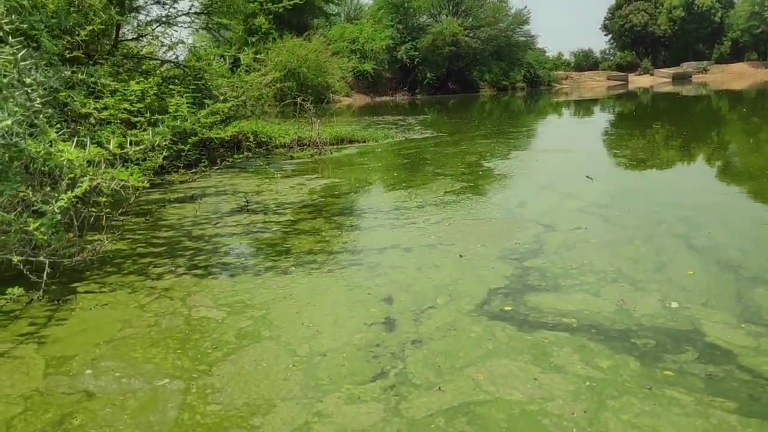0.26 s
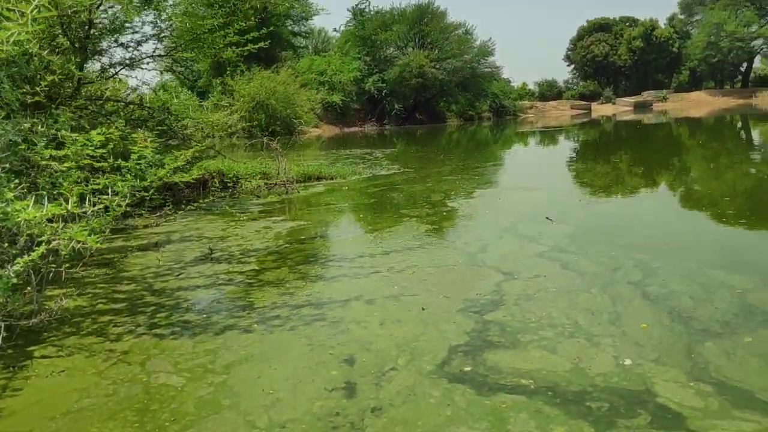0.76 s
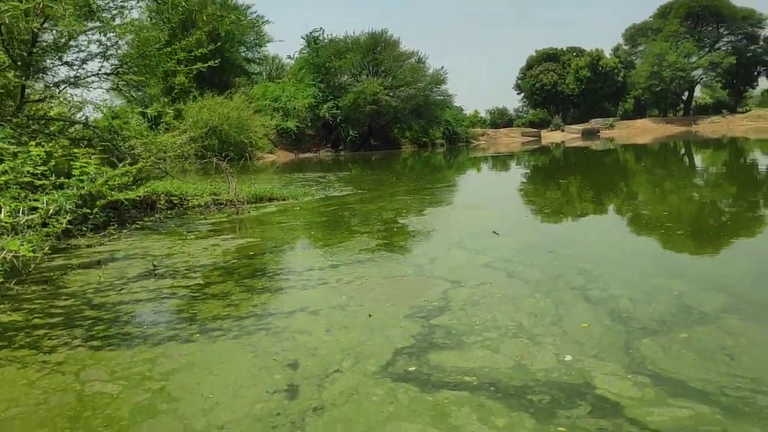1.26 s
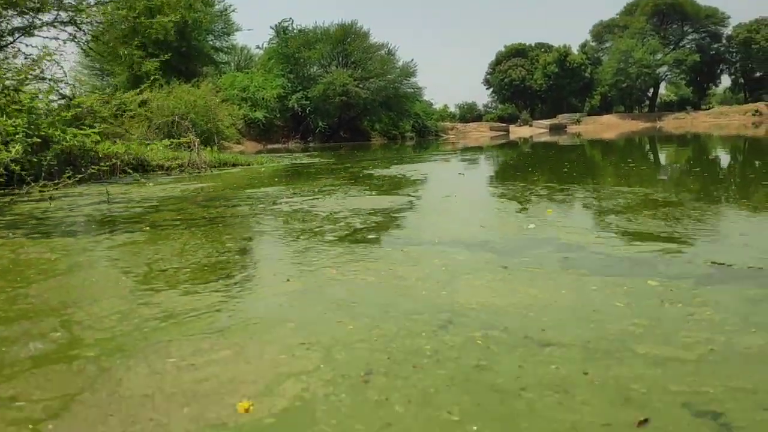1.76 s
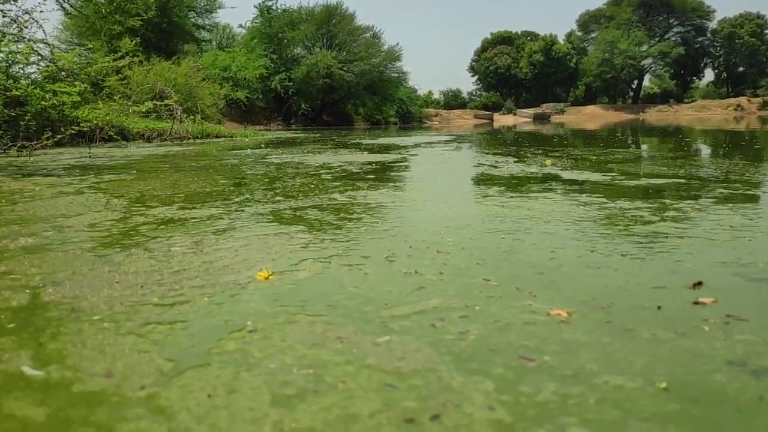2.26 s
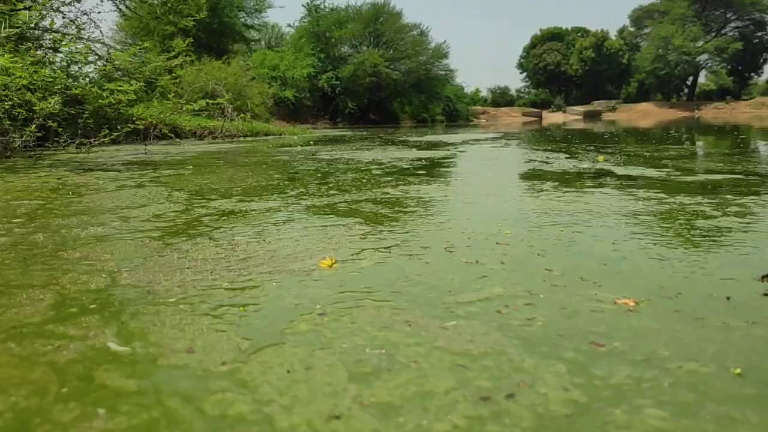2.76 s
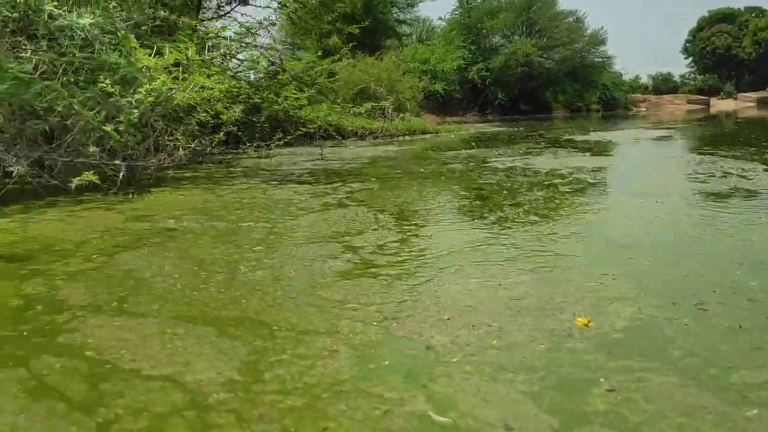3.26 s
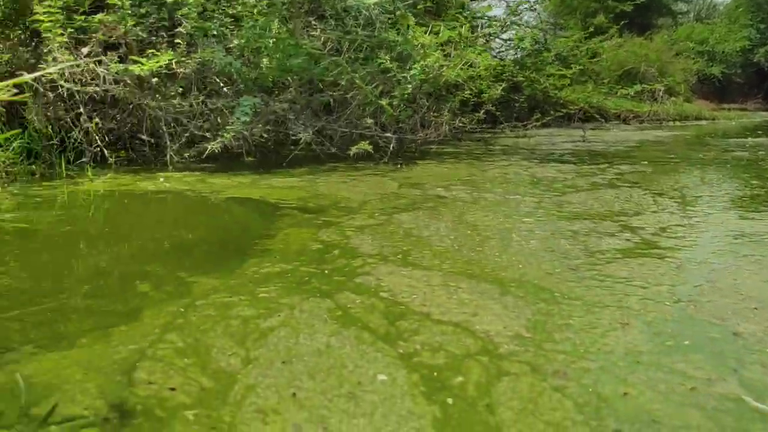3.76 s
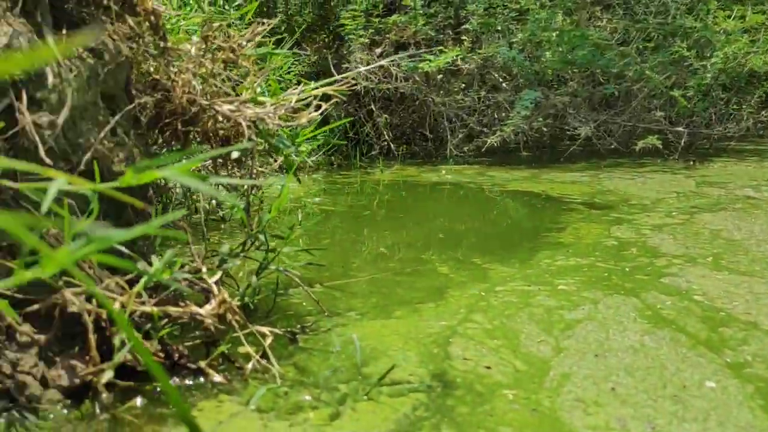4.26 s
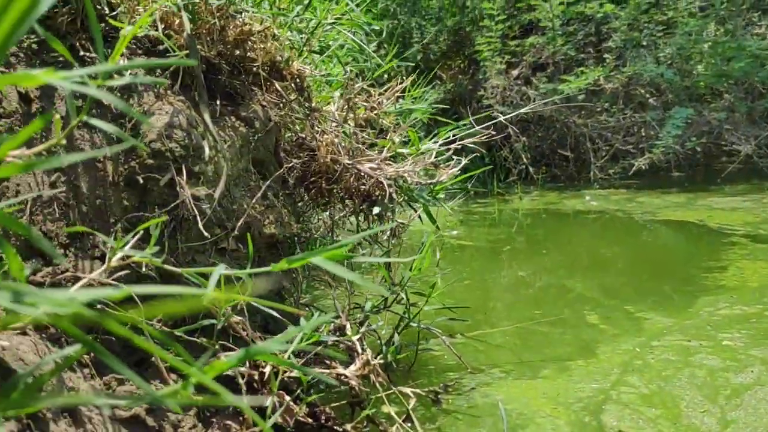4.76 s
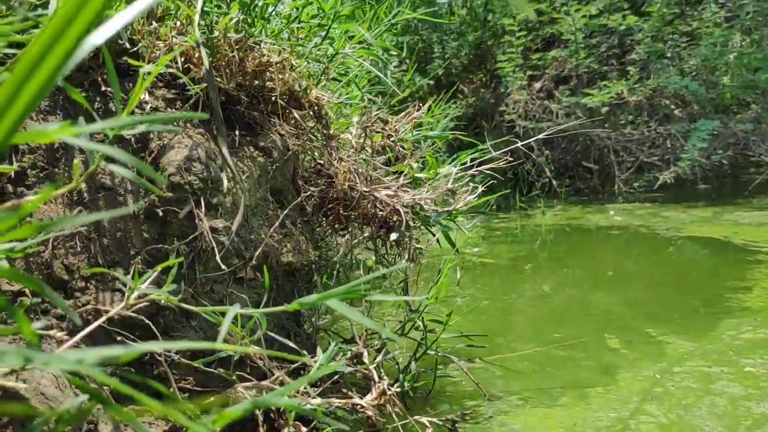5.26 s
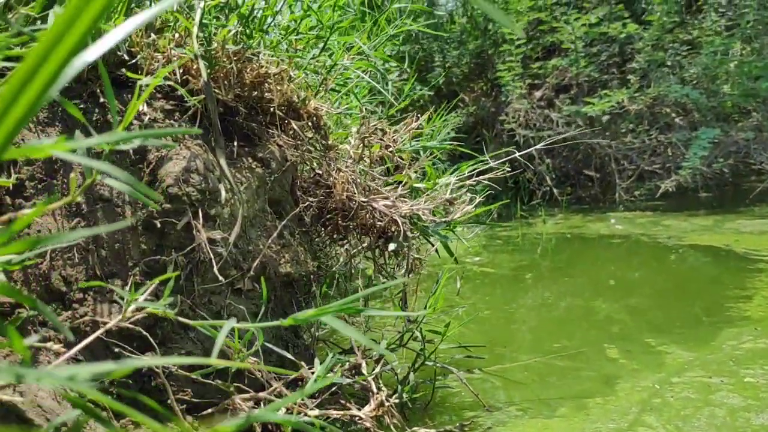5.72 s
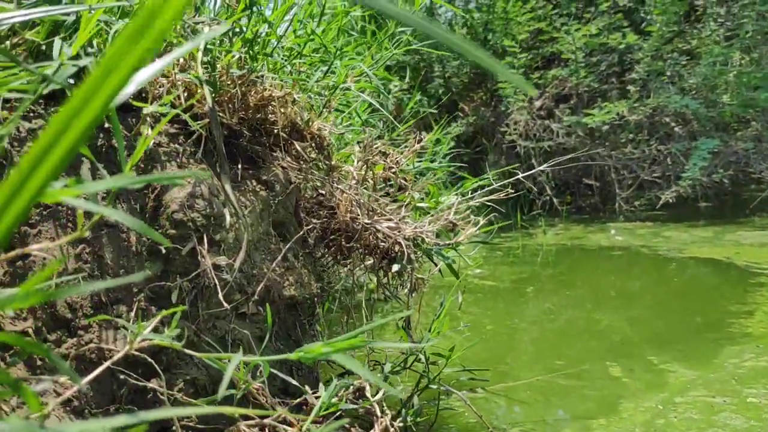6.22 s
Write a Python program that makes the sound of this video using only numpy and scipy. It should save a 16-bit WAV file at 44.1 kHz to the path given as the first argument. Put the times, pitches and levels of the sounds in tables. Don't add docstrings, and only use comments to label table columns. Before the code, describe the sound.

A shrill cicada chorus, centred around 5 to 8 kHz, fills the whole 6.5 seconds, grainy and continuous, with thin wavering whines on top and slight shifts left and right. From 0.1 to 1.4 s a waterhen clucks hoarsely about every quarter second; after a short gap, softer clucks return from 2.0 to 3.4 s. Quick small-bird chirps cluster at 0.4-0.9 s and around 3 s, with faint low whistles farther away. Finger taps and bumps strike the phone at 0.06, 0.55, 0.75-0.82, 1.15 and 1.4 s. A barely audible fly hums around 1-2 s. From 3.9 to 4.65 s stems snap, squeak briefly and scratch close on the right, fading to light rustles by 5.1 s. More chirps follow at 5.3-6.1 s. Low wind puffs press the microphones, strongest at 6.05-6.35 s. Faint distant air lies underneath.

```python
import sys
import numpy as np
from scipy import signal
from scipy.fft import rfft, irfft, next_fast_len
from scipy.io import wavfile
from scipy.ndimage import uniform_filter1d

SR = 44100
rng = np.random.default_rng(int(sys.argv[2]) if len(sys.argv) > 2 else 0)


def master(y):
    cut = np.clip(np.atleast_2d(y).T, -1, 1)
    pcm = np.round(cut * 32767)
    wavfile.write(sys.argv[1], SR, pcm.astype(np.int16))


def invert_db(x):
    u = np.asarray(x, float) / 20
    return 10 ** u


N = 286193
PORT_GAP = 20.05


def evened(x):
    return x / np.sqrt(np.mean(x ** 2) + 1e-20)


def read(points, hz):
    f, value = np.transpose(points)
    return np.interp(np.log(hz + 1), np.log(f + 1), value)


def curves(rows):
    s, *columns = np.transpose(rows)
    return [np.interp(np.arange(N) / SR, s, c) for c in columns]


def sides(pan_db):
    return invert_db(np.array([pan_db / 2, -pan_db / 2]))


def colour(x, points):
    size = next_fast_len(x.shape[-1])
    hz = np.fft.rfftfreq(size, 1 / SR)
    return irfft(rfft(x, size) * invert_db(read(points, hz)), size)[..., :x.shape[-1]]


def drift(rate, count):
    steps = rng.standard_normal((count, N // 256 + 2))
    width = max(int(SR / 256 / rate), 1)
    slow = evened(uniform_filter1d(uniform_filter1d(steps, width), width))
    return np.array([np.interp(np.arange(N) / 256, np.arange(len(row)), row) for row in slow])


def add(mix, s, sound):
    part = mix[:, max(round(s * SR), 0):][:, :sound.shape[1]]
    part += sound[:, :part.shape[1]]


def aimed(note, pan_db, size):
    return np.array([np.pad(note, (0, size)), np.pad(note, (size, 0))]) * sides(pan_db)[:, None]


# t/s, level/dB, left minus right/dB
CHORUS = [
    (0.0, -40, 2.5),
    (0.34, -38.5, 2),
    (1.53, -40, -1.5),
    (1.84, -41, 0.5),
    (2.86, -39, -0.5),
    (3.58, -40, 3),
    (4.3, -37.5, -3),
    (4.68, -38.5, -3),
    (5.3, -38, 0),
    (6.49, -38.5, 0),
]
# f/Hz, level/dB per Hz
TYMBAL = [(1200, -47), (2470, -38.5), (4200, -31.5), (4900, -19), (5430, -5.5), (5710, 0.5), (6200, -2.5),
          (6850, -2), (7300, -10), (7650, -18.5), (7900, -17), (8260, -20.5), (10000, -29), (12300, -25),
          (14300, -35.5)]


def cicadas(count=11):
    size = next_fast_len(N)
    hz = np.fft.rfftfreq(size, 1 / SR)
    pitch_hz = np.linspace(5300, 7600, count)[:, None]
    folded_hz = hz / np.where(hz > 9600, 2, 1)
    share = np.exp(-((folded_hz - pitch_hz) / 330) ** 2) + 0.012
    share /= np.sqrt((share ** 2).sum(0))
    bearing, facing_db = rng.uniform(-0.962, 1, (2, count, 1))
    dice = rng.uniform(-1, 1, (count, N)) * SR / 4000
    clicks = dice * (abs(dice) < 1)
    singers = rfft(clicks * invert_db(4 * drift(rate=1.5, count=count)), size) * share
    lag = np.exp(1j * np.pi * hz * PORT_GAP * (2.329 * bearing + 0.25) / SR)
    left = (singers * lag * invert_db(facing_db)).sum(0)
    right = (singers / lag / invert_db(facing_db)).sum(0)
    pair = np.array([left, right])
    pair += rfft(0.3 * rng.standard_normal((2, N)), size)
    pair = irfft(pair * invert_db(read(TYMBAL, hz)), size)[:, :N]
    db, pan_db = curves(CHORUS)
    return np.array([evened(c) for c in pair]) * invert_db(db + 2.5) * sides(pan_db)


# t/s, f/Hz, level/dB
SOLO = [
    (0.0, 7457, -64),
    (0.58, 7417, -69),
    (0.74, 7422, -61),
    (2.31, 7434, -65),
    (2.75, 7448, -58),
    (4.12, 7434, -63),
    (5.4, 7429, -55),
    (6.49, 7432, -58),
]


def soloist():
    hz, db = curves(SOLO)
    a, b = drift(rate=40, count=2)
    whine = evened(((a + 1j * b) * np.exp(2j * np.pi * np.cumsum(hz) / SR)).real)
    return invert_db(db - 5) * np.array([whine, np.roll(whine, 6)])


# t/s, length/s, first f/Hz, last f/Hz, level/dB
WHINES = [(0.02, 1.35, 7180, 7160, -64), (.3, .9, 7310, 7295, -63), (2.0, 1.0, 7415, 7455, -62),
          (2.3, .65, 7490, 7505, -66), (2.7, .95, 7440, 7500, -62), (2.9, .75, 7385, 7450, -63),
          (4.75, 1.7, 7150, 7145, -60), (5.4, 1.08, 7215, 7220, -61), (4.8, 1.68, 7440, 7415, -61),
          (5.0, .6, 7510, 7520, -66), (5.3, 1.0, 7280, 7285, -66)]


def whines():
    out = np.zeros((2, N))
    waver, flutter = drift(rate=8, count=2 * len(WHINES)).reshape(2, len(WHINES), N)
    for k, (s, length, first_hz, last_hz, db) in enumerate(WHINES):
        count = int(length * SR)
        hz = np.linspace(first_hz, last_hz, count) + 7 * waver[k, :count]
        swell = invert_db(db + 4 + 1.5 * flutter[k, :count]) * signal.windows.tukey(count, 0.4)
        line = np.sin(2 * np.pi * np.cumsum(hz) / SR) * swell
        add(out, s, aimed(line, pan_db=-5, size=6))
    return out


def far(x, t60, wet_db):
    t = np.arange(int(0.2 * SR)) / SR
    tail = rng.standard_normal((2, len(t))) * invert_db(-60 * t / t60) * (t > 0.004)
    return x + invert_db(wet_db) * signal.oaconvolve(x, tail / np.linalg.norm(tail[0]), axes=1)[:, :N]


# t/s, peak level/dB, pitch f/Hz, strongest resonance f/Hz, left minus right/dB
CLUCKS = [(0.1332, -43, 497, 2470, -0.5), (0.3606, -42.5, 515, 2390, 3), (0.6406, -42, 542, 3730, 2),
          (0.9003, -43.5, 509.4, 2690, -0.5), (1.121, -44.5, 459, 2400, -1.5),
          (1.3595, -48, 523, 2670, -2.5), (2.0196, -51.5, 450.6, 2650, 9), (2.2339, -44.5, 534.7, 2850, 1),
          (2.4677, -45, 507, 2720, 3.5), (2.7211, -44.5, 498.4, 2700, 5.5), (2.9413, -50, 449, 2470, 4.5),
          (3.1617, -50, 488, 2670, 10), (3.4093, -48.5, 496, 2590, 2.5)]
# f/Hz, level/dB
THROAT = [(300, -15.5), (520, -9.5), (1000, -13.5), (1500, -7.5), (2100, -10.5), (3100, -2.5), (3900, -6),
          (4600, -16), (6500, -1.5), (11000, -18)]


def waterhen():
    out, t = np.zeros((2, N)), np.arange(2400) / SR
    for s, db, hz, peak_hz, pan_db in CLUCKS:
        wobble, hiss = rng.standard_normal((2, len(t)))
        bend = 0.95 + 0.08 * np.sin(np.pi * t / 0.035) + 0.4 * uniform_filter1d(wobble, 110)
        turns = np.cumsum(hz * bend) / SR
        folds = evened(sum(np.cos(2 * np.pi * k * turns + k * k) for k in range(1, 11)))
        body = np.clip(t / 0.004, 0, 1) * invert_db(-1100 * np.maximum(t - 0.024, 0))
        breath = 0.65 * hiss * (1 + np.cos(2 * np.pi * turns))
        drive = (folds + breath) * body
        ring = signal.lfilter(*signal.iirpeak(peak_hz, 9, SR), drive)
        cluck = colour(drive + 0.7 * ring, THROAT)
        cluck = invert_db(db - 3.5) * cluck / cluck[200:1000].std()
        add(out, s, np.array([cluck, np.roll(cluck, int(PORT_GAP))]) * sides(pan_db)[:, None])
    return far(out, t60=0.12, wet_db=-8)


def whistle(hz, gain, overtone_db, rough):
    flutter = 1 + rough * evened(uniform_filter1d(rng.standard_normal(9000), 150))[:len(hz)]
    turn = 2 * np.pi * np.cumsum(hz) / SR
    return (np.sin(turn) + invert_db(overtone_db) * np.sin(2 * turn)) * flutter * gain


# t/s, length/s, first f/Hz, last f/Hz, level/dB
LOW_NOTES = [(.08, 0.056, 1234, 1270, -84), (.825, 0.07, 1230, 1280, -71.5),
             (1.175, 0.098, 1270, 1400, -76), (1.6, .085, 1350, 1170, -69), (1.875, 0.06, 1240, 1385, -72),
             (1.945, 0.13, 1290, 1074, -66.5), (2.18, 0.11, 1277, 1410, -69),
             (2.33, 0.13, 1118, 1240, -68.5), (2.515, 0.096, 1242, 1375, -72.5),
             (2.74, .07, 1000, 1190, -69), (2.865, .105, 1240, 1313, -73)]
SLURS = [(.02, 0.03, 2210, 2860, -59.5), (.47, 0.041, 2220, 2200, -63), (.84, 0.035, 2080, 2156, -65.5),
         (2.097, 0.08, 2285, 2540, -69), (2.304, .08, 2234, 1833, -62), (2.394, .069, 2400, 2330, -64.5),
         (2.563, 0.063, 1830, 1780, -67), (2.93, .04, 1700, 1564, -68.5), (2.895, 0.035, 2275, 2190, -68),
         (2.965, 0.04, 2640, 2076, -65.5), (3.0, 0.052, 2214, 2550, -63.5), (3.53, 0.026, 2214, 2635, -59)]
CHIRPS = [(.401, .018, 2650, 3020, -51), (.527, 0.024, 3030, 3320, -51), (.678, 0.014, 3000, 3180, -57),
          (.749, .009, 2500, 3150, -56), (.757, .008, 3700, 2620, -47), (.765, .026, 2550, 3200, -50),
          (.911, 0.02, 2950, 3320, -49), (2.84, 0.011, 3850, 3600, -64), (2.85, 0.017, 3300, 3150, -54.5),
          (3.036, .036, 3040, 3420, -57), (3.076, .007, 3050, 2650, -57), (3.455, 0.03, 2680, 3050, -63),
          (3.578, 0.022, 3060, 3180, -66.5), (3.642, 0.018, 3080, 3040, -64),
          (5.347, .045, 3750, 4700, -62), (5.464, 0.009, 3900, 3400, -58), (5.476, 0.018, 2800, 2960, -61),
          (5.526, 0.024, 2850, 3330, -54), (5.585, 0.04, 3750, 4150, -66), (5.711, 0.012, 3500, 2900, -62),
          (5.718, 0.018, 2800, 2960, -55), (5.788, 0.036, 1480, 2360, -65), (5.93, 0.056, 3520, 2480, -54),
          (6.095, 0.03, 4540, 4520, -60)]
SQUEAK = [
    (3.89, 0.015, 937, 1124, -60.5),
]


def whistles():
    out = np.zeros((2, N))
    for notes, bend, gain_db, overtone_db, rough, pan_db, lag in (
            (LOW_NOTES, 3.1, 8.5, -12.5, 0.5, -0.6, 9), (SLURS, 1, 3.1, -35, 0.65, 1.5, 4),
            (CHIRPS, 1, 3.1, -35, 0.45, 1.5, 4), (SQUEAK, 1, 3.1, -35, 0.3, -26, 4)):
        for s, length, first_hz, last_hz, db in notes:
            u = np.linspace(0, 1, int(length * SR))
            glide = u ** bend if last_hz < first_hz else 1 - (1 - u) ** bend
            hz = first_hz + (last_hz - first_hz) * glide
            gain = invert_db(db + gain_db) * signal.windows.tukey(len(u), 0.5)
            add(out, s, aimed(whistle(hz, gain, overtone_db, rough), pan_db, lag))
    return far(out, t60=0.07, wet_db=-10)


# t/s, blow level/dB, hardness/0-1, tick level/dB, left minus right/dB
FINGERS = [(0.064, -26.5, 0.7, -22, 11.5), (.283, -42.5, 0.5, -42, -1.5), (0.5513, -28, 0.66, -32.5, 2.5),
           (.7394, -37.5, 0.7, -47, 18), (0.75, -35, 0.2, -30, 18), (0.755, -37.5, 0.82, -23, 33),
           (0.819, -24.5, 0, -31, 33), (0.8243, -39.5, 1, -46, -29), (1.1476, -31.5, 0.35, -56, -17.5),
           (1.215, -49.5, 0.5, -70, 5), (1.3504, -42.5, 0.5, -78, 11), (1.4142, -24.5, 0, -55, 26),
           (1.419, -40.5, 0.9, -79, 10), (1.428, -31, 0.99, -62, -29), (1.432, -23, 0.57, -30, -5.5)]
# t/s, blow level/dB, hardness/0-1, tick level/dB
STEMS = [(3.8826, -29, 0.41, -39), (3.896, -38, 0.4, -40), (3.946, -32.5, 0, -62),
         (3.9655, -26.5, 0.4, -39), (3.9864, -42, 0, -37), (3.9936, -32.5, 0.3, -51),
         (4.023, -33.5, 0.5, -55), (4.036, -39, 0.12, -42), (4.0542, -54, 0.9, -60),
         (4.067, -32, 0.55, -41), (4.1683, -29, 0.68, -34), (4.2346, -42, 0.6, -69),
         (4.31, -26.5, 0.82, -25.5), (4.3461, -25, 0.86, -28), (4.351, -27, 0.58, -44.5),
         (4.3571, -31.5, 0.06, -39), (4.375, -30, 0.73, -56), (4.387, -34, 0.8, -38),
         (4.4154, -26, 0.93, -37), (4.4279, -25, 0.4, -29.5), (4.433, -32.5, 0.57, -22),
         (4.456, -40, 0.5, -48), (4.4906, -38.5, 0.37, -62), (4.586, -24.5, 0, -33), (4.603, -40, 1, -73),
         (4.6079, -26.5, 1, -49), (4.618, -40, 0, -25), (4.6274, -30, 0.6, -23.5), (4.6347, -30, 1, -52),
         (5.0445, -41, 0.91, -44)]
STEM_PAN_DB = -32.5
MISMATCH_DB = 54
# f/Hz, level/dB
CRACK = [(1200, -25), (2000, -1), (4000, -2.5), (6000, -8), (9000, -25)]
TICK = [(3500, -25), (5500, -3), (8500, 2.5), (12000, -4), (15000, -8)]


def snaps():
    out, t = np.zeros((2, N)), np.arange(-40, 700) / SR
    for s, db, hard, tick_db, pan_db in FINGERS + [(*row, STEM_PAN_DB) for row in STEMS]:
        thump_db, knock_db, crack_db = db - MISMATCH_DB * (np.arange(3) / 2 - hard) ** 2
        tune = rng.uniform(0.85, 1.15, 2) * (0.7 + 0.5 * hard)
        grit = rng.standard_normal((2, len(t)))
        thump = np.sin(2 * np.pi * 380 * tune[0] * t + 1.5) * np.exp(-t / 0.0019)
        knock = np.sin(2 * np.pi * 850 * tune[1] * t + 0.052) * np.exp(-t / 0.00074)
        crack = evened(colour(grit[0], CRACK)) * np.exp(-abs(t) / 0.0015)
        tick = evened(colour(grit[1], TICK)) * np.exp(-abs(t) / 0.0008)
        snap = invert_db(thump_db - 2.5) * thump + invert_db(knock_db + 6) * knock
        snap += invert_db(crack_db + 4.5) * crack / abs(crack).max()
        snap += invert_db(tick_db + 6) * tick / abs(tick).max()
        snap *= np.clip(t / 0.00036 + 1.325, 0, 1) ** 2
        near = invert_db(1.6 * np.minimum([pan_db, -pan_db], 0))[:, None]
        lag = int(PORT_GAP * np.sign(pan_db))
        add(out, s + t[0], np.array([snap, np.roll(snap, lag)]) * near)
    return out


# t/s, length/s, level/dB
STROKES = [(3.894, 0.14, -65), (3.943, 0.21, -58.5), (4.124, 0.19, -59), (4.297, 0.027, -50.5),
           (4.326, 0.069, -46.5), (4.386, 0.074, -47.5), (4.427, 0.12, -60), (4.564, 0.091, -50),
           (4.616, 0.1, -55.5), (4.689, 0.11, -68.5), (4.758, 0.14, -69.5), (4.885, 0.084, -60.5),
           (4.988, 0.14, -62.5)]
# f/Hz, level/dB
GRASS = [(100, 5.5), (300, -2), (900, -0.5), (3000, -3), (6000, -8.5), (10000, -7), (14000, -18.5)]


def rustle():
    grains = rng.random(N) < 1200 / SR
    size = invert_db(4 * np.minimum(rng.exponential(1, N), 4)) * grains
    fade = np.exp(-np.arange(400) / SR / 0.0034)
    scratch = signal.oaconvolve(size, fade)[:N] * rng.standard_normal(N)
    drag = np.zeros((1, N))
    for s, length, db in STROKES:
        add(drag, s, invert_db(db + 9) * signal.windows.tukey(int(length * SR), 0.9)[None])
    crackle = evened(colour(scratch, GRASS)) * drag[0]
    return np.array([invert_db(-54) * np.roll(crackle, 20), crackle])


# t/s, length/s, lowest f/Hz, level/dB, left minus right/dB
SLIDES = [
    (.048, .02, 9000, -60, 20),
    (.263, .034, 11800, -56, 20),
    (.538, .032, 10500, -62, 20),
    (.735, .02, 9000, -54, 20),
    (.79, .012, 12500, -58, 20),
    (.805, .028, 9500, -56, 20),
    (1.115, .03, 12800, -61, 20),
    (4.3, .026, 9000, -52, -25),
    (4.9, .05, 8000, -65, -25),
    (5.035, .03, 12500, -64, -25),
]


def slides():
    out = np.zeros((2, N))
    for s, length, low_hz, db, pan_db in SLIDES:
        grit, grain = rng.standard_normal((2, 3000))
        rough = grit * invert_db(2.5 * evened(uniform_filter1d(grain, 50)))
        hiss = evened(colour(rough, [(0.8 * low_hz, -30), (low_hz, -5), (14000, 0)]))
        count = int(length * SR)
        gain = invert_db(db + np.minimum([pan_db, -pan_db], 0))[:, None]
        add(out, s, gain * hiss[:count] * signal.windows.tukey(count, 0.5))
    return out


# middle t/s, length/s, level/dB, left minus right/dB
PUFFS = [(1.168, 0.086, -42.5, 16.5), (1.456, 0.35, -49.5, -20), (4.124, 0.098, -45, -1),
         (4.437, 0.26, -58, -23), (4.555, 0.071, -46.5, 22), (4.803, 0.3, -49.5, 3), (4.945, 0.08, -55, 37),
         (5.136, 0.071, -53, 25), (5.252, 0.19, -59, -17.5), (5.89, 0.39, -56.5, -18.5),
         (6.057, 0.11, -37.5, -6), (6.162, 0.027, -23.5, -5.5), (6.35, 0.22, -32, -9),
         (6.482, 0.029, -53.5, 9)]
# f/Hz, level/dB per Hz
GUST = [(18, -21.5), (30, 6.5), (90, -6.5), (162, -17), (400, -53.5), (439, -75), (500, -44), (650, -74),
        (1100, -120)]
BREEZE_DB, BREEZE_PAN_DB = -60.5, 0.5


def wind():
    t = np.arange(N) / SR
    push = invert_db(BREEZE_DB) * sides(BREEZE_PAN_DB)[:, None] * np.ones(N)
    for s, length, db, pan_db in PUFFS:
        push += invert_db(db) * sides(pan_db)[:, None] * np.exp(-(2 * (t - s) / length) ** 2)
    lumps = rng.standard_normal((2, N)) * invert_db(2.5 * drift(rate=18, count=2))
    return evened(colour(lumps, GUST)) * push * invert_db(-4.5)


# t/s, f/Hz, level/dB
FLY = [
    (0.948, 172.6, -82),
    (1.914, 200.8, -76.5),
    (2.05, 192, -78),
]


def fly():
    hz, db = curves(FLY)
    t = np.arange(N) / SR
    passing = np.clip(np.minimum(t - FLY[0][0], FLY[-1][0] - t) / 0.069, 0, 1)
    return invert_db(db + 7 + 8 * drift(rate=15, count=1)) * passing * np.sin(2 * np.pi * np.cumsum(hz) / SR)


# f/Hz, level/dB per Hz
AIR = [(18, -12), (30, 6), (60, -6), (189, -11.5), (266, -16), (683, -25), (962, -36), (2690, -24),
       (2930, -23), (3330, -30), (4120, -50), (5000, -8.5), (6500, -49), (11000, -120)]
AIR_DB = -62


def air():
    frames, hz = N // 256 + 5, np.fft.rfftfreq(1024, 1 / SR)
    a, b, c, d, patches = rng.standard_normal((frames, 513, 5)).T
    patches = evened(uniform_filter1d(uniform_filter1d(patches, 10, 0), 14, 1))
    same = np.clip(1.06 / (1 + (hz / 500) ** 2) + 0.0098, 0, 1)[:, None]
    late = np.exp(-2j * np.pi * hz * PORT_GAP * 0.78 / SR)[:, None]
    left = a + 1j * b
    right = same * late * left + np.sqrt(1 - same ** 2) * (c + 1j * d)
    z = np.array([left, right]) * invert_db(read(AIR, hz)[:, None] + 2.1 * patches)
    return invert_db(AIR_DB + 3) * evened(signal.istft(z, nperseg=1024, noverlap=768)[1][:, :N])


# f/Hz, level/dB
RIGHT_PORT = [(4000, 1.5), (5100, -1), (6200, 1.5), (7300, 4.5), (8000, 2), (9500, -5.5), (11500, -6),
              (13000, -14), (14300, -13)]


def scene():
    distant = cicadas() + soloist() + waterhen() + whistles() + fly() + air()
    near = snaps() + rustle() + wind() + slides()
    return np.array([distant[0], colour(distant[1], RIGHT_PORT)]) + near + whines()


# f/Hz, level/dB
STARVED = [(300, -30), (700, -3), (1100, 4), (2200, 1.5), (3600, 4.5), (4600, -3), (5300, -30), (8000, -30),
           (8800, -8), (10300, -2), (11500, -9), (13000, -6), (13900, -1), (14300, 4), (14400, 20)]


def starve(x):
    hz, t, z = signal.stft(x, SR, "cosine", 2048, 1024)
    usual = np.sqrt(uniform_filter1d(np.median(abs(z) ** 2, 2), 16, 1))[..., None]
    budget = np.repeat(rng.standard_normal((len(hz) // 10 + 1, len(t))), 10, 0)[:len(hz)]
    budget = evened(uniform_filter1d(budget, 3, 1))
    step = 2 * usual * invert_db(read(STARVED, hz)[:, None] + 7.5 * budget * (hz < 14350)[:, None])
    kept = np.round(abs(z) / step) * step / (abs(z) + 1e-12)
    top = invert_db(np.where(hz > 14350, -24 - (hz - 14350) / 60, 0))[:, None]
    return signal.istft(z * kept * top, SR, "cosine", 2048, 1024)[1][:, :N]


def bursts(x):
    top = colour(x, [(14250, -80), (14400, -6), (15000, -22), (15600, -36)])
    level = np.sqrt(abs(uniform_filter1d(top ** 2, 60)))
    is_open = 1.0 * (level > invert_db(-63))
    return top * uniform_filter1d(is_open, 40)


def roll_off(x):
    return signal.sosfilt(signal.butter(12, 15520, fs=SR, output="sos"), x)


def record(dry):
    mix = starve(dry) + bursts(dry)
    return roll_off(mix)


dry = scene()
out = record(dry)
master(out)
```